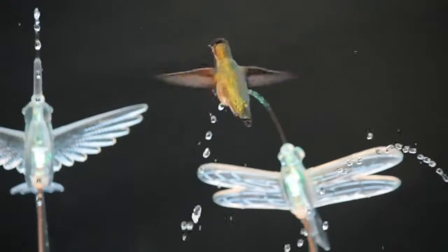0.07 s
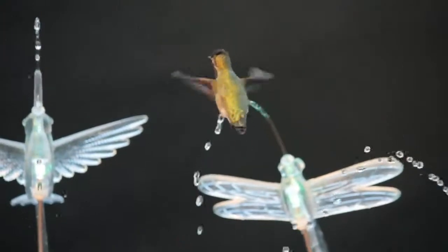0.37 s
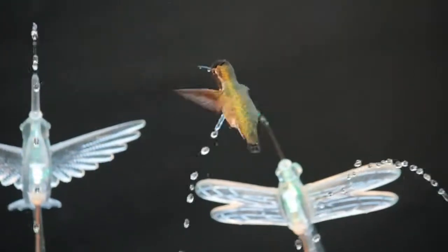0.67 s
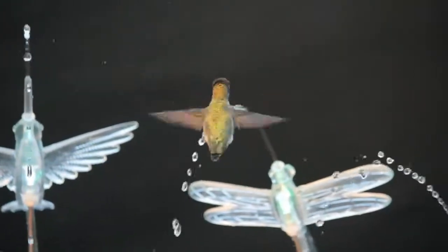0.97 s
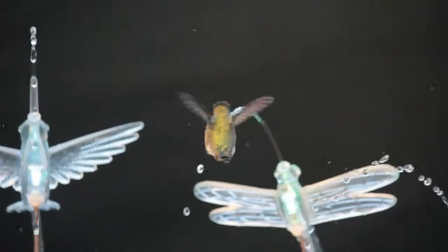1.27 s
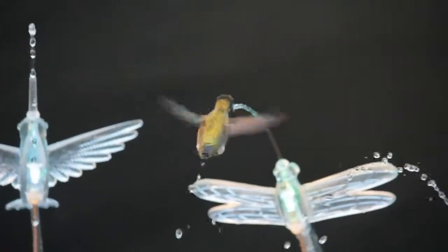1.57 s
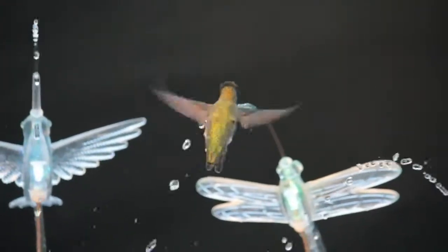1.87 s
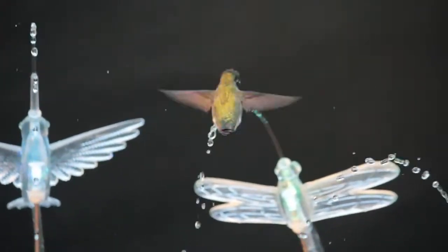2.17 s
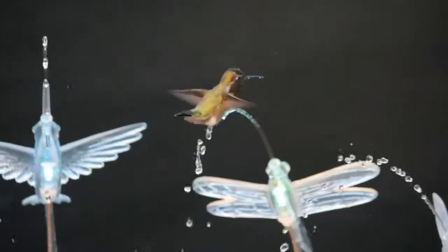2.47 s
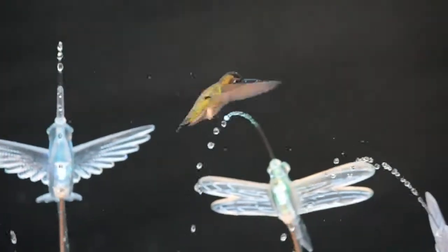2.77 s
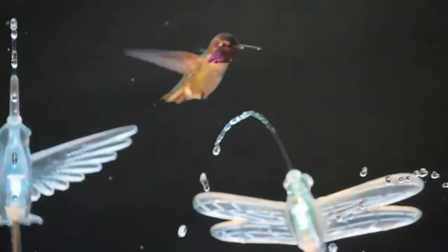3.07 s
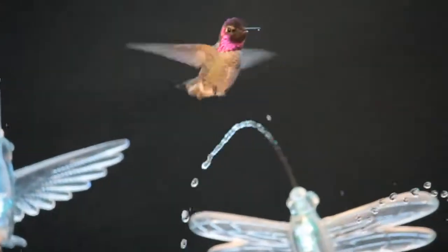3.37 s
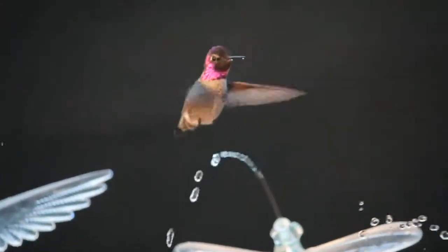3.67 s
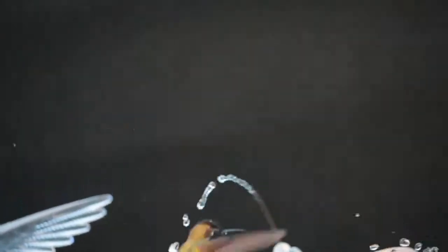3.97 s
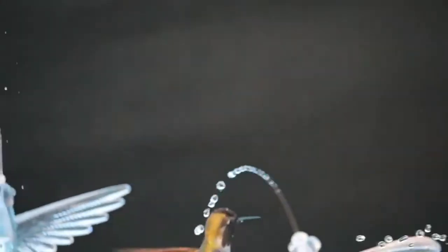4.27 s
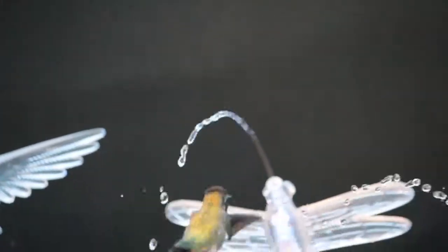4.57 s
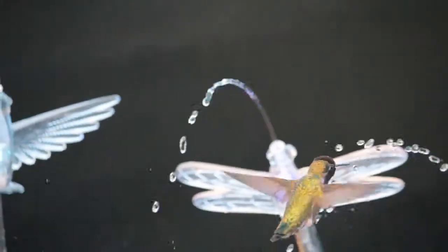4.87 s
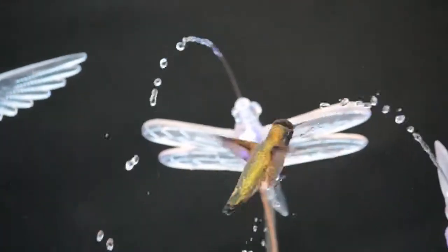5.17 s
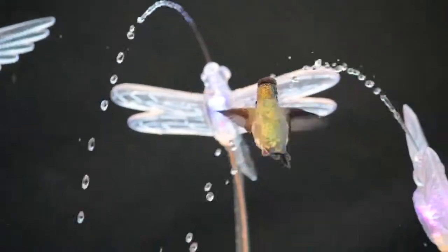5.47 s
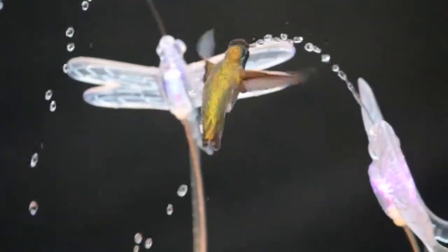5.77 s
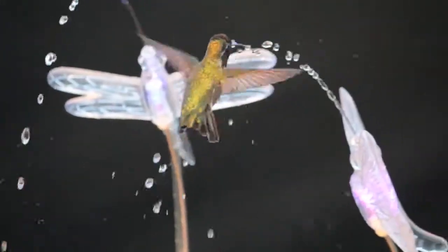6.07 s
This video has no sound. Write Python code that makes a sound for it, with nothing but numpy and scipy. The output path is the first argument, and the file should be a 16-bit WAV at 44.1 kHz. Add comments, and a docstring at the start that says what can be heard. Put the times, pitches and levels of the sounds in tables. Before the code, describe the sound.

A small garden fountain trickles steadily, its thin jets breaking into drops that plink, gurgle and spatter in a basin. Some drops land with a dry snap or a brief fizz of spray. A low pump hum and soft air run underneath, and a bird gives a few faint, short chirps. The water sounds close and comes from the left, with only hiss on the right.

```python
"""A small garden fountain gurgles and spatters over the low hum of its pump and a wash of air.
Its thin jets break into drops: each ticks on impact and traps an air bubble that rings as a
Minnaert resonator, or bursts with a dry snap. The basin resonates, nearby walls reflect the
sound, and a bird chirps faintly. The microphone feeds the left channel; the right holds only hiss."""
import sys
import numpy as np
from scipy import signal
from scipy.fft import rfft, irfft, next_fast_len
from scipy.io import wavfile
from scipy.ndimage import map_coordinates

SR = 44100
rng = np.random.default_rng(int(sys.argv[2]) if len(sys.argv) > 2 else 0)


def materialize(psi):
    """Save the field psi as 16-bit PCM at rate SR to the path in sys.argv[1].

    A 1-D psi becomes a single channel; in a 2-D psi each row is a channel.
    """
    bounded = np.clip(np.atleast_2d(psi).T, -1, 1)
    quanta = np.round(bounded * 32767).astype(np.int16)
    wavfile.write(sys.argv[1], SR, quanta)


N = 270333


def amp(db):
    """Decibels to amplitude ratio."""
    return 10 ** (np.asarray(db) / 20)


def unit(x):
    """Normalisation to rms 1."""
    return x / np.sqrt(np.mean(x ** 2) + 1e-20)


def along(points, hz):
    """Interpolation of (frequency [Hz], value) points on a logarithmic frequency axis."""
    f, v = np.transpose(points)
    return np.interp(np.log(hz + 1), np.log(f + 1), v)


def filtered(x, response):
    """Linear filtering: the spectrum of x times a frequency response."""
    size = next_fast_len(N + SR // 2)
    return irfft(rfft(x, size) * response(np.fft.rfftfreq(size, 1 / SR)), size)[..., :N]


def coloured(x, points):
    """Spectral shaping by (frequency [Hz], gain [dB]) points, at rms 1."""
    return unit(filtered(x, lambda hz: amp(along(points, hz))))


def add(track, s, sound):
    """Superposition: a sound joins the track at time s."""
    start = int(np.clip(round(s * SR), 0, N - 1))
    track[start:start + len(sound)] += sound[:N - start]


def bubble(hz, t60, climb):
    """Minnaert resonance: trapped air rings as a damped oscillator, rising in pitch near the surface."""
    t = np.arange(int(t60 * SR) + 8) / SR
    age = t / t60
    swell = (1 - np.exp(-t / min(0.0288 * t60, 0.000997))) ** 2
    phase = 2 * np.pi * hz * t * (1 + climb * (age / 2 - 1 / 6))
    return swell * amp(-60 * age) * np.sin(phase)


def swarm(rate, centre_hz, spread, cycles, scatter_db, climb):
    """Incoherent sum: small bubbles ring at random moments, a few much louder than the rest."""
    track = np.zeros(N)
    for when, pitch, life, size in rng.random((int(rate * N / SR), 4)):
        logistic = np.log((pitch + .02) / (1.02 - pitch))
        hz = min(centre_hz * np.exp(spread * logistic), SR / 3)
        t60 = cycles * 2 ** (2 * life - 1) / hz
        db = scatter_db * min(-np.log(1 - size), 3)
        add(track, when * N / SR, amp(db) * bubble(hz, t60, climb))
    return track


DEEP_HZ = 2600  # divides deep bubbles from high ones


def clumps(deep, rise_s=0.0168, fall_s=0.0305):
    """Power addition: an envelope of water landing in clumps, one around each deep (or high) bubble."""
    t = np.arange(N) / SR
    knots = t[::SR // 500]
    ages = knots - np.array([[s] for s, hz, *_ in BUBBLES if (hz < DEEP_HZ) == deep])
    power = np.exp(-2 * np.maximum(-ages / rise_s, ages / fall_s)).sum(axis=0)
    return unit(np.interp(t, knots, np.sqrt(power)))


# spectral shapes of the deep and the high swarm: (frequency [Hz], relative gain [dB])
GURGLE = [(350, -22), (560, -11.5), (700, -4.5), (1000, 0.5), (1500, -2.5), (2300, 7), (3200, -3),
          (6000, 3.5)]
SPATTER = [(1200, -19.5), (2800, -11.5), (4000, 0.5), (6200, 0), (7500, 5), (10000, 6), (12000, -3.5),
           (16000, -20.5)]
# slow drift of the swarms: (time [s], gurgle gain [dB], spatter gain [dB])
DRIFT = [(0.05, -50.5, -47.5), (0.9, -55.5, -51.5), (1.15, -53, -52), (1.56, -54.5, -51.5),
         (2.02, -56, -51.5), (3.11, -54.5, -51), (3.3, -54.5, -52.5), (3.88, -58.5, -50.5),
         (4.09, -64.5, -46.5), (4.31, -52.5, -51), (4.54, -60.5, -46), (4.85, -50, -51), (5.47, -60, -49.5),
         (5.95, -50.5, -48)]


def gurgle_and_spatter():
    """Amplitude modulation: two swarms of small bubbles swell with each clump of water."""
    times, *gains = np.transpose(DRIFT)
    gurgle_db, spatter_db = [np.interp(np.arange(N) / SR, times, db) for db in gains]
    deep = swarm(rate=200, centre_hz=1093.3, spread=.32, cycles=35.96, scatter_db=3.0, climb=0.567)
    high = swarm(rate=1100, centre_hz=5400, spread=0.2915, cycles=19.4, scatter_db=6.5, climb=0.467)
    gurgle = coloured(deep, GURGLE) * (amp(-4.0) + amp(-6.5) * clumps(deep=True))
    spatter = coloured(high, SPATTER) * (amp(-3) + amp(-8) * clumps(deep=False))
    return amp(gurgle_db) * gurgle + amp(spatter_db) * spatter


# partials of the pump's hum: (frequency [Hz], rms level [dB])
PUMP = [(119.9, -46), (143.6, -58.5), (179.9, -69.5), (240, -63.5)]


def pump(wobble_hz=4.007, wobble_db=0.68):
    """Forced vibration: the pump hums chiefly at twice the mains frequency, slightly unsteady in level."""
    t = np.arange(N) / SR
    hum = np.zeros(N)
    for hz, db in PUMP:
        knots = rng.standard_normal(int(N * wobble_hz / SR) + 4)
        wobble = map_coordinates(knots, [t * wobble_hz])
        hum += np.sqrt(2) * amp(db + wobble_db * wobble) * np.sin(2 * np.pi * (hz * t + rng.random()))
    return hum


# spectrum of the wash: (frequency [Hz], relative density [dB])
WASH = [(20, -27.5), (55, -9), (90, 7), (130, 6.5), (180, 4.5), (250, 2), (350, -5), (550, -5),
        (800, -19.5), (1500, -44.5), (2800, -13), (5500, -18.5), (10000, -16.5), (14000, -24.5)]


def wash():
    """Stationary noise: spray and garden air blend into an even wash."""
    return amp(-48.5) * coloured(rng.standard_normal(N), WASH)


# decay of the wall reflections: (frequency [Hz], reverberation time [s])
WALL_DECAY = [(400, 0.5), (1500, 0.132), (5000, 0.0661), (12000, 0.02)]
# their spectrum: (frequency [Hz], relative gain [dB])
WALL_COLOUR = [(400, 7.5), (900, -1.5), (2000, 7.5), (2800, 7), (4200, 6), (6000, 0.5), (8000, -2.5),
               (13000, -26)]


def reflections(x, rim_db, wall_db, rim_t60=0.0352, wall_rise_s=0.000544):
    """Reverberation: direct sound, early echoes off the rim and a diffuse tail, drawn anew each call."""
    hz, t, spectra = signal.stft(rng.standard_normal(SR // 3), SR, nperseg=256)
    fading = amp(along(WALL_COLOUR, hz)[:, None] - 60 * t / along(WALL_DECAY, hz)[:, None])
    tail = signal.istft(spectra * fading, SR, nperseg=256)[1]
    age = np.arange(len(tail)) / SR
    tail *= 1 - np.exp(-age / wall_rise_s)
    sparse_echoes = rng.standard_normal(len(age)) * (rng.random(len(age)) < .03)
    rim = sparse_echoes * (age > .001) * amp(-60 * age / rim_t60)
    response = amp(rim_db) * rim / np.linalg.norm(rim) + amp(wall_db) * tail / np.linalg.norm(tail)
    return x + signal.oaconvolve(x, response)[:N]


# resonances of the basin: (frequency [Hz], bandwidth [Hz], relative peak gain [dB])
BASIN_MODES = [(427.6, 11.4, 12), (507.9, 4.1, 6), (629.5, 13.9, 4.5), (682.8, 10.6, -3), (769.5, 21.4, -6),
               (856, 21.3, 1), (907.2, 19.4, 3.5), (1112.7, 17.6, -7), (1199, 11.2, 2), (1262.4, 17.6, 0.5),
               (1565, 30.6, -7), (1811.3, 30.7, -6), (1980, 74, -4), (2410, 17, -23), (4350, 60, -21),
               (6118, 543, -4.5)]


def basin(x, ring_db):
    """Normal modes: the basin rings on as a bank of second-order resonators."""
    def modes(f):
        return sum(amp(db) * 1j * f * width / (hz * hz - f * f + 1j * f * width)
                   for hz, width, db in BASIN_MODES)
    return x + amp(ring_db) * filtered(x, modes)


def tick(centre_hz, t60, rise_s, octaves):
    """Impact transient: the brief contact of drop and water radiates a broad band of noise."""
    t = np.arange(512) / SR
    f = np.fft.rfftfreq(len(t), 1 / SR)
    band = np.exp(-np.log2((f + 1) / centre_hz) ** 2 / (2 * octaves ** 2))
    noise = unit(irfft(rfft(rng.standard_normal(len(t))) * band))
    return noise * (1 - np.exp(-t / rise_s)) * amp(-60 * t / t60)


def splash(hz, db, base_db, fade_db, window_s, spread, count):
    """Cavity collapse sheds lesser bubbles; the later ones are softer and tend to be higher."""
    burst = np.zeros(N // 20)
    first_db = base_db + 0.418 * db  # a splash grows more slowly than its main bubble
    for delay, pitch, life, climb in rng.random((count, 4)):
        lesser_hz = min((hz + 230) * np.exp(spread * (1.5 * pitch + 0.571 * delay - .9)), SR / 3)
        t60 = 11 * 2.572 ** life / lesser_hz
        ring = amp(first_db - fade_db * delay) * bubble(lesser_hz, t60, 2.12 * climb)
        start = int(window_s * delay ** 1.5 * SR)
        burst[start:start + len(ring)] += ring[:len(burst) - start]
    return burst


# drops that burst with a dry snap: (time [s], frequency [Hz], level [dB])
SNAPS = [(0.0045, 4290, -19), (0.0835, 4550, -17), (0.1269, 9400, -17), (0.1594, 4600, -15.5),
         (0.16, 9100, -15), (0.197, 6700, -15.5), (0.2521, 2120, -26), (0.3687, 3540, -22.5),
         (0.4025, 5650, -21), (0.4805, 5930, -13.5), (0.523, 6300, -19.5), (0.4839, 2060, -24),
         (0.6595, 5770, -20), (0.7677, 6550, -24), (0.8276, 4870, -21.5), (0.9771, 7600, -17),
         (0.9952, 1302, -28), (1.0144, 8320, -16.5), (1.08, 6920, -9.5), (1.1098, 9800, -11.5),
         (1.1662, 9900, -11.5), (1.231, 9100, -22.5), (1.2351, 4040, -23.5), (1.2579, 10080, -20.5),
         (1.3015, 7530, -19), (1.358, 5140, -17.5), (1.4975, 8500, -18.5), (1.6093, 7680, -18.5),
         (1.6739, 7530, -16.5), (1.8575, 6080, -14), (1.956, 4550, -20.5), (1.957, 9100, -17.5),
         (2.054, 3820, -14.5), (2.0767, 7200, -11.5), (2.1503, 6040, -10), (2.3688, 1496, -32),
         (2.4703, 2600, -21), (2.4849, 6100, -22), (2.5404, 4400, -20.5), (2.566, 5800, -17),
         (2.618, 9200, -20), (2.7227, 3384, -18.5), (2.727, 3290, -21), (2.8056, 5540, -17.5),
         (2.8841, 6250, -17.5), (3.0735, 4170, -21), (3.2868, 6490, -6), (3.2869, 9020, -12),
         (3.2916, 1740, -29.5), (3.5331, 3780, -19), (3.6147, 9900, -20.5), (3.744, 10400, -21.5),
         (3.8023, 7230, -20.5), (3.8978, 6250, -22), (3.9317, 6100, -16), (3.932, 3880, -23.5),
         (3.9688, 1282, -19), (3.9695, 4550, -16), (4.171, 4560, -21.5), (4.2485, 5450, -19.5),
         (4.3193, 4140, -18.5), (4.3712, 4710, -20), (4.471, 3560, -17.5), (4.668, 8960, -18.5),
         (4.7392, 9100, -13), (4.7486, 6100, -14), (4.7875, 4260, -10.5), (4.7935, 6450, -13.5),
         (4.8171, 6510, -16.5), (4.8545, 7800, -18), (4.897, 4280, -18), (5.1074, 10100, -13),
         (5.207, 8000, -17), (5.2082, 4370, -16), (5.27, 3470, -21.5), (5.369, 4670, -25),
         (5.4634, 4650, -12.5), (5.533, 2030, -17.5), (5.5745, 4240, -17.5), (5.6, 10400, -20),
         (5.6065, 6190, -9.5), (5.612, 4420, -17), (5.653, 4250, -21), (5.662, 7430, -10.5),
         (5.976, 6760, -20.5)]


def snaps(spots, cycles=9.57):
    """Heavy damping: a cavity that collapses at once rings for only a few cycles."""
    for k, (s, hz, db) in enumerate(SNAPS):
        spot = spots[k % len(spots)]
        add(spot, s, amp(db) * bubble(hz, cycles / hz, climb=0))
        add(spot, s, amp(db - 10.5) * tick(hz + 990, t60=0.00426, rise_s=0.000166, octaves=0.92))
        add(spot, s, splash(hz, db, base_db=-18, fade_db=19, window_s=.02, spread=0.546, count=9))


def satellites(drops, lag_s=.02, relative_db=-14.5, spread=0.2032, cycles=27.8, climb=0.127):
    """Jet break-up: a weaker satellite trails each drop; its row has the same columns."""
    rows = []
    for s, hz, db, *_ in drops:
        when, pitch, size, rise = rng.standard_normal(4)
        landing_s = s + lag_s * np.exp(when / 2)
        satellite_hz = min(hz * np.exp(spread * pitch), SR / 4)
        rows.append((landing_s, satellite_hz, db + relative_db + size, cycles, climb * abs(rise)))
    return rows


# drops that trap a bubble:
# (time [s], frequency [Hz], level [dB], 60 dB decay [cycles], pitch climb [fraction])
BUBBLES = [(0.04, 956, -45, 59, 0.083), (0.0893, 1474, -23, 49, 0), (0.1065, 777, -33.5, 55, 0.11),
           (0.109, 6000, -27, 34, 0), (0.132, 1092, -29.5, 41, 0.44), (0.165, 4640, -18.5, 16, 0),
           (0.25, 1128, -33.5, 58, 0.029), (0.253, 3860, -19, 5.9, 0), (0.262, 1730, -41.5, 38, 0),
           (0.2821, 1038, -33.5, 51, 0.076), (0.293, 3920, -26, 37, 0.25), (0.304, 705.4, -36, 42.4, 0.56),
           (0.4727, 3904, -17.0, 49.5, 0.033), (0.5073, 5593, -16.5, 66, 0.45),
           (0.5618, 3540, -20, 23.2, 0.037), (0.585, 1285, -36, 26, 0.044), (0.617, 988, -38, 48, 0),
           (0.646, 8000, -26, 32, 0), (0.7073, 856, -37, 63, 0.02), (0.735, 4600, -14.5, 28.3, 0.46),
           (0.845, 745, -38.5, 46, 0.15), (0.8745, 1958, -33, 42.3, 0.53), (0.896, 9080, -26, 35, 0.016),
           (0.8973, 5470, -27, 77, 0.051), (0.949, 6280, -18.5, 19.7, 0.42),
           (0.9535, 1092, -31.0, 50, 0.57), (0.978, 4890, -20, 34, 0), (1.0585, 1228, -31.5, 41, 0.36),
           (1.0752, 730, -31, 52, 0.235), (1.0914, 740, -32.5, 56.5, 0.38), (1.12, 8870, -14.5, 27, 0.12),
           (1.159, 5980, -24.5, 25, 0), (1.1653, 4750, -24, 51, 0.36), (1.18, 5990, -22.5, 34, 0),
           (1.216, 6840, -17.5, 18, 0.033), (1.2347, 2148, -28.5, 63.6, 0), (1.264, 6000, -24, 26.5, 0),
           (1.2684, 1302, -31.5, 45.5, 0.29), (1.27, 4570, -28, 31, 0), (1.281, 9100, -25, 35, 0),
           (1.365, 9100, -24, 34, 0.014), (1.3669, 2146, -27, 48, 0.16), (1.375, 6063, -10, 31, 0.44),
           (1.391, 6050, -25.5, 31, 0.1), (1.4169, 745.3, -25.5, 44.2, 0.455),
           (1.497, 4420, -17, 21.5, 0.057), (1.528, 3930, -29.5, 31, 0), (1.6126, 766.4, -38, 71, 0.082),
           (1.6719, 887.6, -30.5, 40.5, 0.58), (1.7564, 643, -28.5, 30, 0),
           (1.7679, 627.7, -32, 38.7, 0.14), (1.8027, 991, -27, 34, 0.11), (1.824, 6800, -23.5, 36.5, 0),
           (1.842, 2270, -35.5, 42, 0.1), (1.8466, 6400, -15, 22, 0.067), (1.864, 6000, -22.5, 30, 0),
           (1.8835, 4420, -16.5, 37.5, 0.082), (1.929, 3900, -26, 39.5, 0), (1.9549, 1677, -23, 43, 0.38),
           (1.972, 1140, -29, 49, 0.013), (1.988, 5996, -20, 31, 0), (2.065, 3950, -23, 23.4, 0.079),
           (2.1006, 1083, -31.5, 49.5, 0.64), (2.1555, 5870, -9, 39.4, 0.17), (2.158, 3430, -26, 35, 0.013),
           (2.2292, 3253, -19, 10.7, 0.038), (2.2588, 5360, -22.5, 73, 0.15), (2.268, 1967, -36.5, 35, 0),
           (2.288, 838, -36.5, 31.5, 0), (2.329, 2740, -31, 63, 0.12), (2.3685, 960, -23, 22, 0),
           (2.378, 5730, -19.5, 24.5, 0.059), (2.384, 961, -29, 39, 0.093), (2.4707, 1607, -21, 21.4, 0.15),
           (2.475, 3420, -26, 45, 0), (2.4753, 1528, -24.5, 50, 0.13), (2.476, 1980, -28.5, 73, 0.028),
           (2.506, 6270, -23.5, 44, 0.052), (2.562, 5230, -21, 32.5, 0.036),
           (2.564, 1676, -24.5, 22, 0.056), (2.582, 1718, -30, 47, 0), (2.5885, 4714, -17.5, 51, 0.022),
           (2.601, 4540, -28, 34, 0), (2.6156, 873, -32, 33.6, 0.33), (2.675, 6370, -24.5, 31.6, 0.2),
           (2.702, 919, -39, 40.5, 0.17), (2.725, 2369, -32.5, 86, 0.011), (2.732, 4540, -26.5, 36, 0),
           (2.7587, 771, -38, 44, 0.026), (2.777, 9120, -26.5, 33.5, 0), (2.8105, 668.7, -31.5, 48, 0),
           (2.82, 1452, -28.5, 40.5, 0), (2.839, 8320, -14, 24.6, 0.64), (2.889, 1132, -34.5, 26.6, 0),
           (2.9, 1612, -26, 22, 0.29), (2.9155, 6583, -16.5, 60, 0.014), (2.9541, 723, -23, 44, 0.103),
           (2.955, 6010, -24.5, 30, 0), (2.964, 5980, -29.5, 30, 0), (2.9709, 734.3, -26, 40, 0.12),
           (3.0451, 754.7, -31.5, 34, 0), (3.0569, 6030, -22.5, 56, 0.008), (3.0874, 3693, -24, 60, 0.1),
           (3.1374, 1051, -30.5, 62.4, 0.45), (3.153, 4540, -26, 36, 0), (3.1623, 3947, -11, 29.7, 0.09),
           (3.192, 877, -36.5, 44, 0.091), (3.2434, 660.3, -34.5, 53, 0.021),
           (3.2797, 4492, -11.0, 48.2, 0.048), (3.3185, 841, -31, 26, 0.36), (3.3784, 7350, -22, 51, 0.46),
           (3.385, 6970, -27, 40, 0.088), (3.442, 3805, -27.5, 32, 0.29), (3.4689, 4550, -15, 37, 0),
           (3.513, 3530, -27.5, 32, 0.27), (3.5364, 2007, -31, 33, 0.065), (3.5547, 986.5, -22, 25.7, 0.19),
           (3.592, 9130, -25.5, 35, 0), (3.5947, 900, -28.5, 52.6, 0.414), (3.6145, 7610, -16.5, 85, 0.13),
           (3.621, 8600, -25.5, 38, 0), (3.6957, 1181, -39, 61, 0), (3.742, 1619, -29.5, 54, 0.15),
           (3.762, 1003, -32, 36.7, 0.016), (3.8743, 777.6, -34, 50, 0), (3.917, 4154, -19.5, 50, 0.15),
           (3.919, 6900, -25.5, 35, 0), (3.9871, 775.2, -31, 56.7, 0.24), (4.085, 6086, -22, 66, 0.15),
           (4.101, 2540, -28.5, 47, 0.12), (4.109, 876, -33, 58.5, 0), (4.13, 1074, -27.5, 68, 0.082),
           (4.151, 6000, -24, 32, 0), (4.174, 1865, -30.0, 45, 0), (4.177, 987, -27.5, 26, 0.052),
           (4.1863, 689.4, -25, 28, 0.025), (4.209, 5910, -23, 53, 0), (4.244, 5930, -22, 30, 0),
           (4.264, 800.7, -31.5, 59.5, 0.515), (4.282, 5970, -24, 50, 0.06), (4.37, 2326, -15, 43, 0.35),
           (4.3817, 1190, -22.5, 38.7, 0.175), (4.4104, 3924, -15.5, 36.5, 0.21),
           (4.5618, 1420, -27, 38.8, 0.46), (4.6743, 1537, -25, 35.6, 0.58), (4.6977, 1833, -25, 47, 0),
           (4.7316, 1080, -27, 46.4, 0.025), (4.7435, 2009, -25, 62, 0), (4.827, 5060, -12.5, 46, 0),
           (4.864, 1960, -37.5, 32, 0.014), (4.8687, 875, -32, 40.7, 0.18), (4.9089, 2333, -29, 45, 0),
           (5.0365, 5720, -14, 21.7, 0.063), (5.053, 671, -37.5, 35, 0), (5.0649, 2058, -23.5, 49.5, 0.22),
           (5.0689, 798, -31.5, 55.5, 0.47), (5.249, 4310, -15.5, 28.5, 0), (5.2586, 1863, -31.5, 60, 0.19),
           (5.2707, 6810, -10, 21.6, 0.092), (5.4207, 5966, -18.5, 48, 0), (5.49, 1097, -30, 27, 0),
           (5.497, 7920, -30, 35, 0), (5.5731, 6225, -22.5, 39, 0.3), (5.6056, 4370, -14.5, 29.7, 0),
           (5.6165, 1519, -26, 34, 0.39), (5.629, 780, -34.5, 65, 0.22), (5.6671, 1122, -23.5, 19.6, 0.27),
           (5.76, 1085, -36, 45, 0.13), (5.8203, 1123, -20.5, 43.7, 0.064), (5.889, 5400, -20, 17.4, 0.32),
           (5.918, 1238, -26.5, 41.7, 0.18), (5.9261, 1664, -20.5, 8.4, 0.44),
           (5.945, 6818, -21, 70, 0.0094), (5.956, 914, -30, 44, 0.17), (5.9761, 2800, -17.5, 6.4, 0.048),
           (5.989, 1977, -30.5, 38, 0), (5.99, 5800, -24, 34, 0), (6.032, 1300, -34.5, 34, 0.079),
           (6.047, 5860, -18.5, 15.2, 0.55), (6.05, 1573, -30.5, 52, 0.019), (6.06, 1537, -26, 46, 0.15),
           (6.097, 9230, -23.5, 35, 0), (6.0991, 915, -35.5, 57, 0.058), (6.113, 6440, -20.5, 30, 0.041)]


def ringing_drops(spots):
    """Air entrainment: each drop ticks on impact, traps a ringing bubble and splashes."""
    for k, (s, hz, db, cycles, climb) in enumerate(list(BUBBLES) + satellites(BUBBLES)):
        spot = spots[k % len(spots)]
        base_db = -26 if hz < DEEP_HZ else -25.5
        add(spot, s, amp(db) * bubble(hz, cycles / hz, climb))
        add(spot, s, amp(db - 12) * tick(hz + 1300, t60=0.00693, rise_s=0.000262, octaves=0.713))
        add(spot, s, splash(hz, db, base_db, fade_db=14, window_s=.03, spread=0.4216, count=14))


def glide(length, first_hz, last_hz, bend, lean, rasp, rasp_hz):
    """Frequency modulation: a bending tone swells and fades; lean under 1 makes it peak early."""
    age = np.linspace(0, 1, int(length * SR))
    jitter = map_coordinates(rng.standard_normal(SR // 20), [age * length * rasp_hz])
    hz = (first_hz + (last_hz - first_hz) * age ** bend) * (1 + rasp * jitter)
    return np.sin(np.pi * age ** lean) * np.sin(2 * np.pi * np.cumsum(hz) / SR)


# surfacing bubbles: (time [s], duration [s], first frequency [Hz], last frequency [Hz], level [dB])
SURFACING = [(0.132, 0.0398, 996.7, 1472, -43), (1.059, 0.0187, 1200, 2042, -40.5),
             (1.525, 0.033, 1455, 2365, -46), (1.70, 0.0096, 1480, 2300, -39.5),
             (1.792, 0.023, 936, 1200, -35), (2.105, 0.0182, 1003, 1400, -46),
             (2.76, 0.014, 751, 1240, -44.5), (3.608, 0.0297, 975.5, 2085, -41.5),
             (3.698, 0.0128, 2270, 3250, -42), (4.386, 0.0225, 1156, 1683, -35.5),
             (4.455, 0.0197, 1910, 2414, -41), (4.895, 0.0114, 3370, 5000, -41.5),
             (5.155, 0.0094, 3510, 4600, -38.5), (5.666, 0.023, 1050, 1874, -40),
             (5.918, 0.0251, 1409, 4020, -40)]


def surfacing_bubbles(spots):
    """Mass loading falls as a bubble reaches the surface, so its pitch sweeps upward."""
    for k, (s, length, first_hz, last_hz, db) in enumerate(SURFACING):
        sweep = glide(length, first_hz, last_hz, bend=1.438, lean=0.79, rasp=0.0028, rasp_hz=500)
        add(spots[k % len(spots)], s, amp(db) * sweep)


# showers of spray: (time [s], duration [s], level [dB])
SPRAYS = [(0.483, 0.154, -50), (0.935, 0.028, -49), (1.149, 0.058, -42.5), (1.224, 0.038, -50),
          (2.145, 0.0287, -36.5), (2.25, 0.043, -46.5), (2.471, 0.029, -42.5), (2.559, 0.063, -47),
          (3.033, 0.062, -45.5), (4.359, 0.028, -40), (4.726, 0.0585, -46.5), (5.052, 0.0768, -42.5),
          (5.198, 0.0455, -48.5), (5.402, 0.046, -40), (5.597, 0.0254, -40.5), (5.705, 0.037, -46.5),
          (5.93, 0.037, -41.5)]


def spray():
    """Secondary impacts: fine droplets thrown up by a splash fall back as a short, soft fizz."""
    flow = np.zeros(N)
    for s, length, db in SPRAYS:
        age = np.linspace(0, 1, int(length * SR))
        add(flow, s, amp(db) * np.sin(np.pi * age ** 0.726))
    fizz = swarm(rate=1400, centre_hz=4600, spread=0.1447, cycles=32, scatter_db=5.0, climb=0.118)
    return flow * unit(fizz)


# bird chirps: (time [s], duration [s], first frequency [Hz], last frequency [Hz], level [dB])
CHIRPS = [(0.605, 0.0706, 4653, 3920, -39.5), (1.399, 0.041, 3602, 3475, -45.5),
          (2.237, 0.0554, 4666, 4210, -40.5), (4.11, 0.0447, 4265, 4060, -37),
          (5.361, 0.0726, 3110, 4150, -47)]


def bird():
    """Frequency glides: short, nearly pure chirps hold their pitch and then bend away."""
    song = np.zeros(N)
    for s, length, first_hz, last_hz, db in CHIRPS:
        chirp = glide(length, first_hz, last_hz, bend=1.7, lean=0.97, rasp=0.0243, rasp_hz=1200)
        add(song, s, amp(db) * chirp)
    return reflections(song, rim_db=-13.5, wall_db=-5.0)


# drops that land with a bright crack: (time [s], level [dB])
CRACKS = [(1.3752, -27.5), (1.498, -28), (2.4704, -12), (2.4849, -15.5), (3.2869, -14), (3.616, -22.5),
          (3.622, -28), (4.3712, -16.5), (4.7487, -21), (5.9757, -27.5)]


def cracks(spots):
    """Time-bandwidth reciprocity: the briefest impacts have the widest spectra."""
    for k, (s, db) in enumerate(CRACKS):
        crack = tick(centre_hz=12500, t60=0.00215, rise_s=.00005, octaves=1.19)
        add(spots[k % len(spots)], s, amp(db) * crack)


def fountain(spot_count=14):
    """Multipath propagation: each landing spot has its own echoes, and all excite the basin."""
    small_bubbles = gurgle_and_spatter() + spray()
    spots = np.zeros((spot_count, N))
    ringing_drops(spots)
    snaps(spots)
    surfacing_bubbles(spots)
    cracks(spots)
    drops = sum(reflections(spot, rim_db=-7.0, wall_db=-12.5) for spot in spots)
    # drops this small trap no bubbles large enough to ring in the bass
    drops = signal.sosfilt(signal.butter(3, 520, "highpass", fs=SR, output="sos"), drops)
    water = amp(0.5) * drops + reflections(small_bubbles, rim_db=-4.5, wall_db=-8.0)
    return basin(water, ring_db=0.5)


# response of the microphone: (frequency [Hz], gain [dB])
MICROPHONE = [(9000, 2), (10500, 2.5), (12000, -3.5), (15000, -15.5)]


def scene():
    """Superposition in the left channel; the microphone softens the top octave of water and bird."""
    air = wash()
    near = filtered(fountain() + bird(), lambda hz: amp(along(MICROPHONE, hz)))
    return np.array([near + pump() + air, np.zeros(N)])


# spectrum of the recorder's hiss: (frequency [Hz], relative density [dB])
HISS = [(15, 11.5), (40, 12.5), (130, 14), (350, 9), (700, 6.5), (1000, 2), (3000, 1), (15000, 0)]


def record(dry, top_hz=15600):
    """Self-noise and band limiting: each channel gains hiss and a DC offset, and ends at top_hz."""
    hiss = amp(-50.0) * coloured(rng.standard_normal((2, N)), HISS)
    offset = np.array([[-.016], [.011]])
    return filtered(dry + hiss, lambda hz: hz < top_hz) + offset


dry = scene()
out = record(dry)
materialize(out)
```